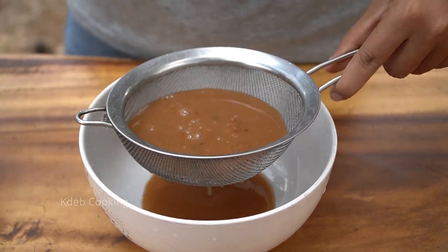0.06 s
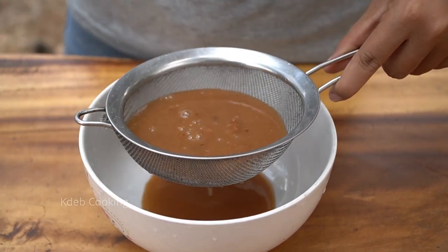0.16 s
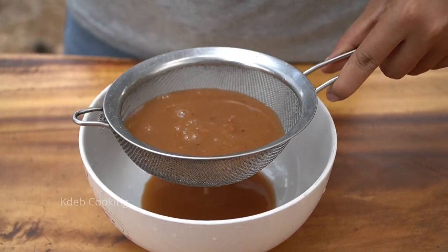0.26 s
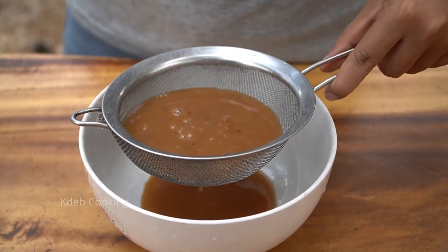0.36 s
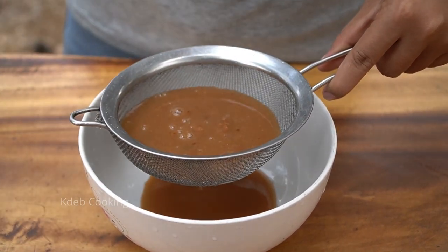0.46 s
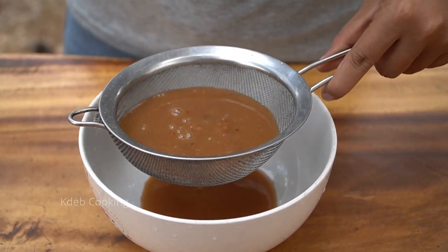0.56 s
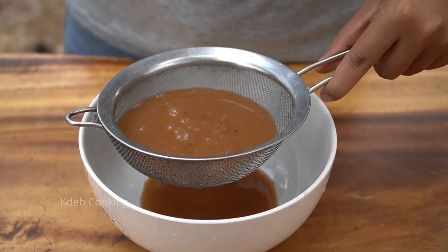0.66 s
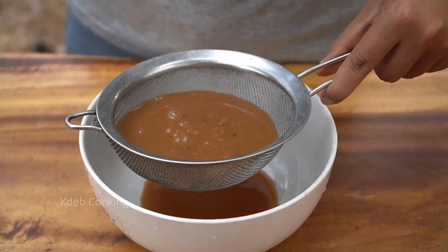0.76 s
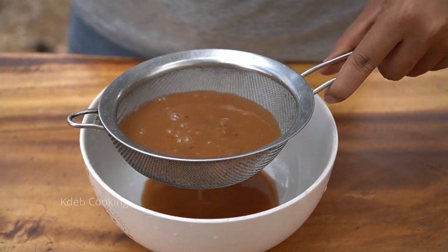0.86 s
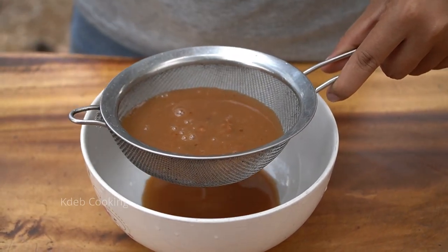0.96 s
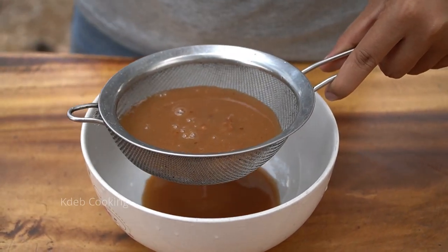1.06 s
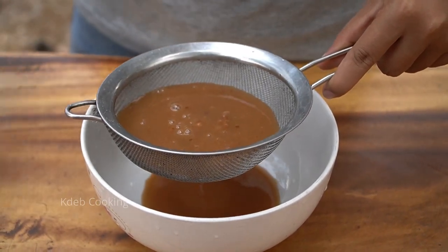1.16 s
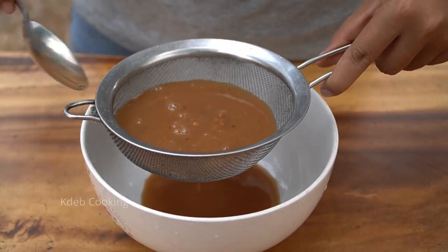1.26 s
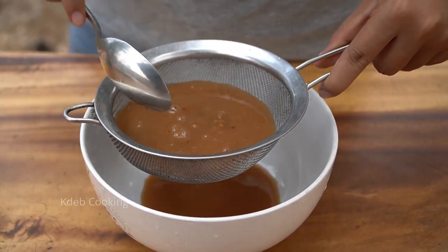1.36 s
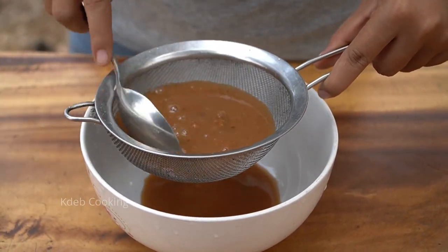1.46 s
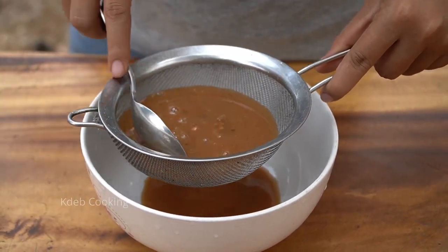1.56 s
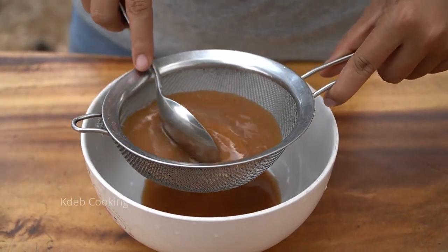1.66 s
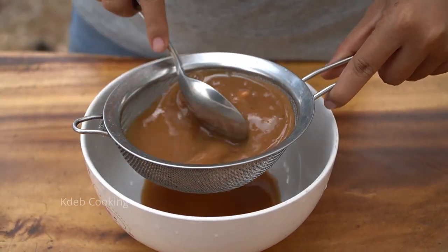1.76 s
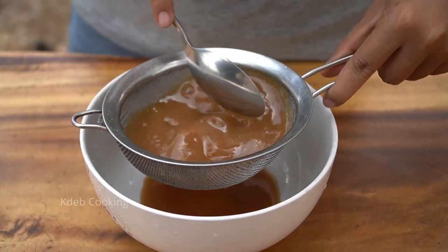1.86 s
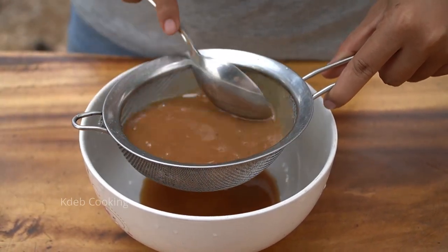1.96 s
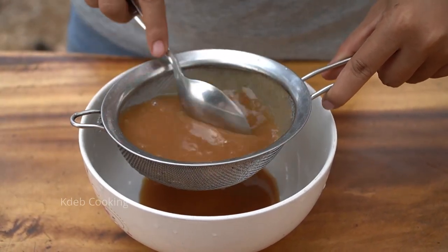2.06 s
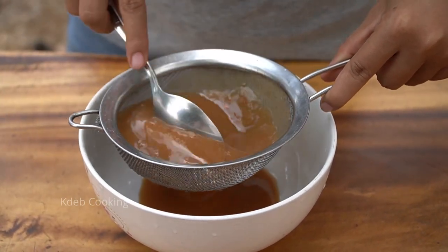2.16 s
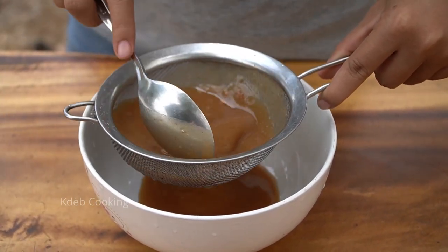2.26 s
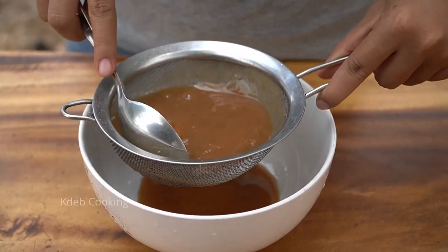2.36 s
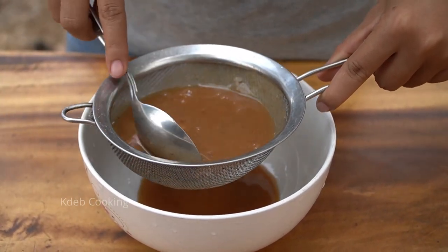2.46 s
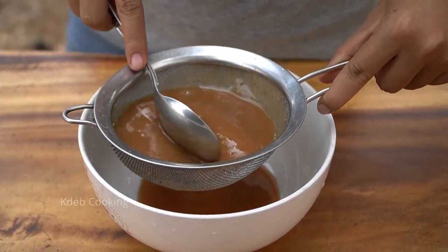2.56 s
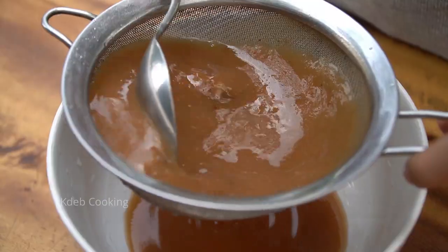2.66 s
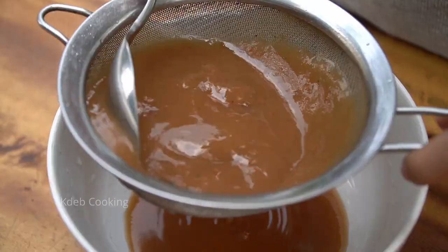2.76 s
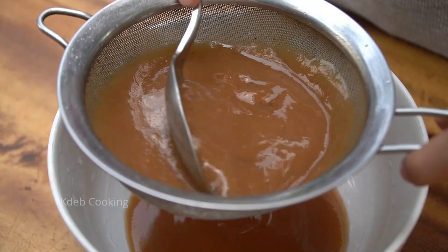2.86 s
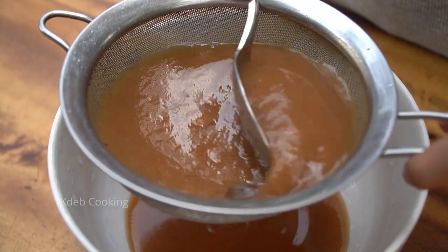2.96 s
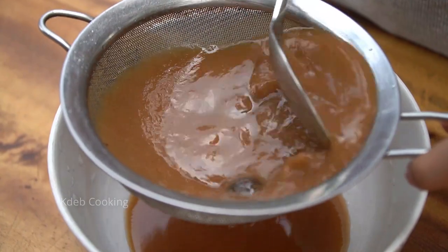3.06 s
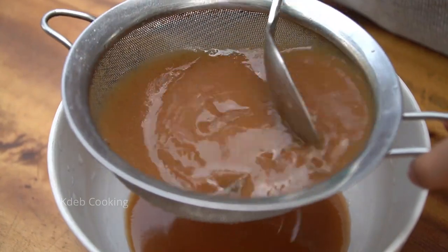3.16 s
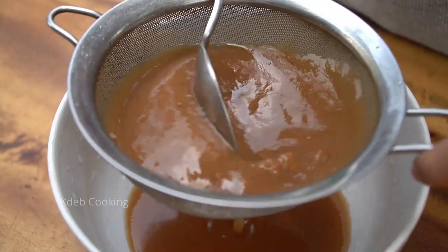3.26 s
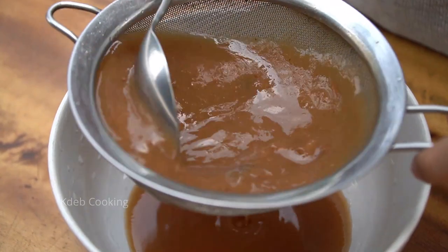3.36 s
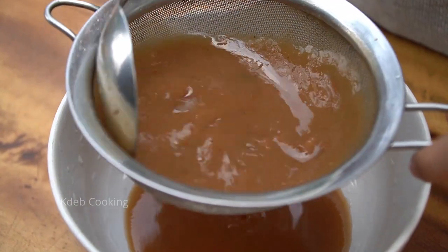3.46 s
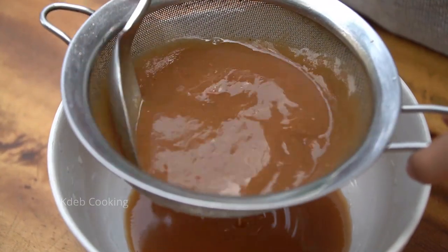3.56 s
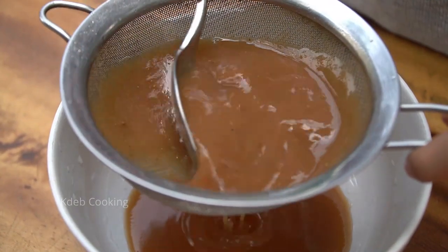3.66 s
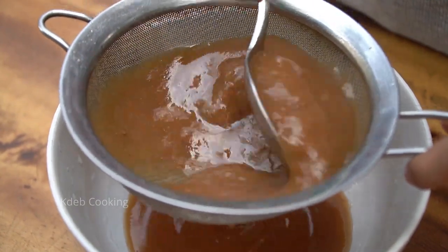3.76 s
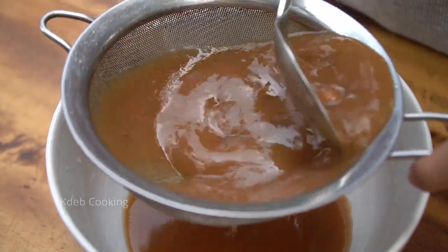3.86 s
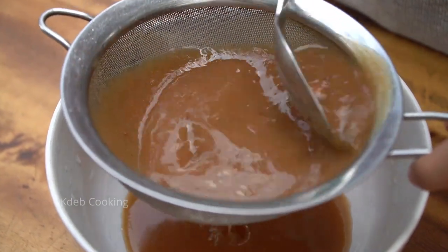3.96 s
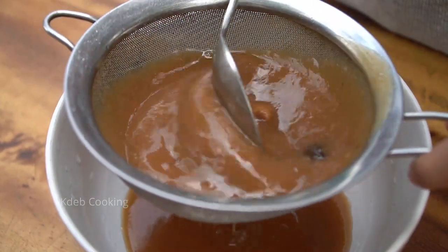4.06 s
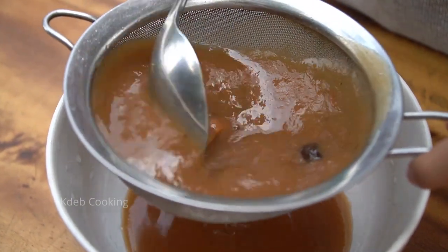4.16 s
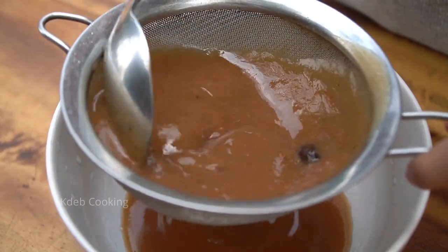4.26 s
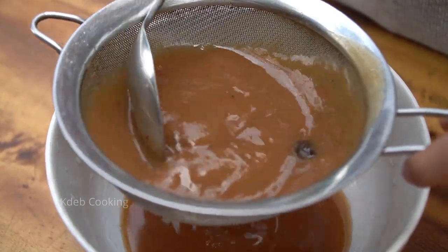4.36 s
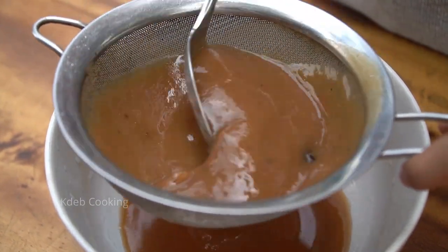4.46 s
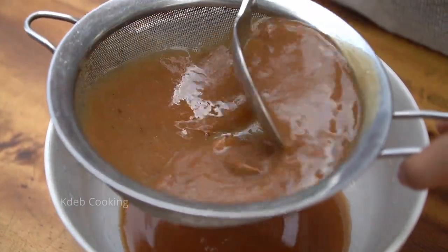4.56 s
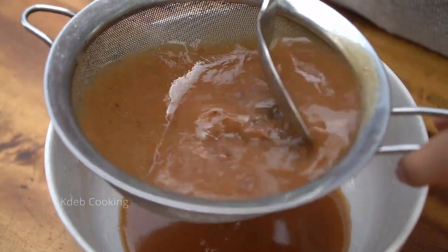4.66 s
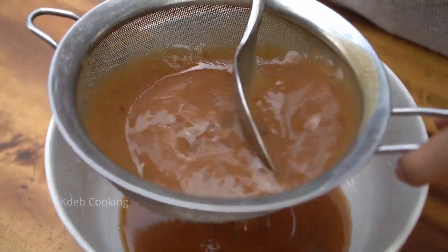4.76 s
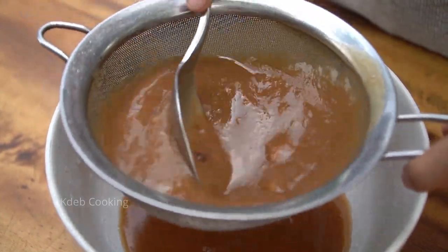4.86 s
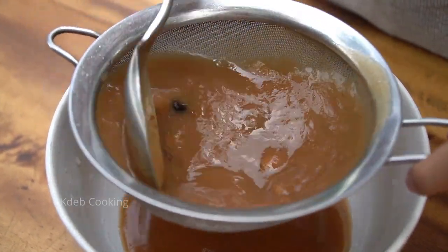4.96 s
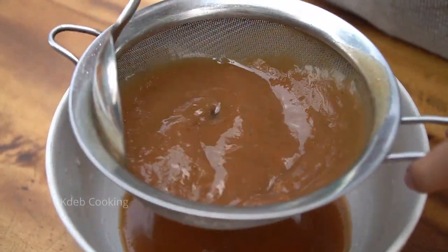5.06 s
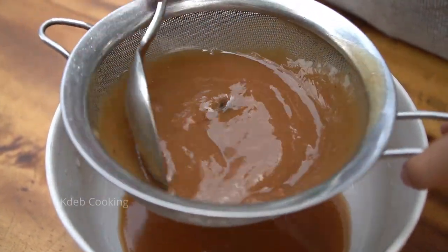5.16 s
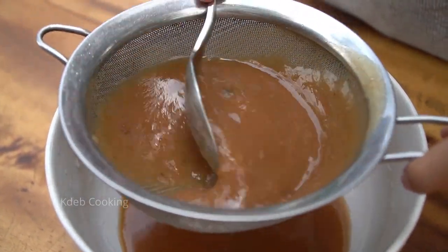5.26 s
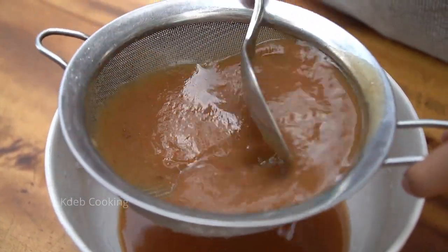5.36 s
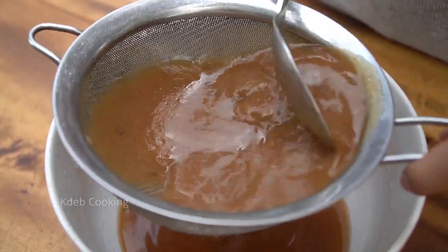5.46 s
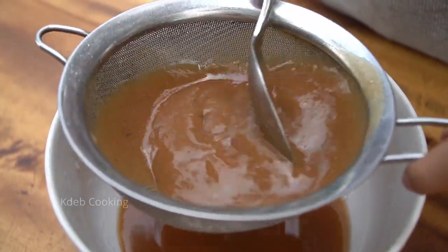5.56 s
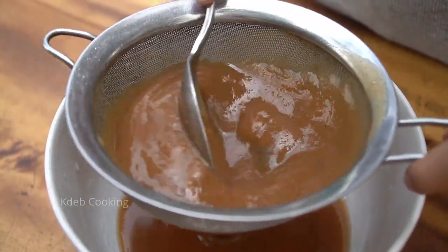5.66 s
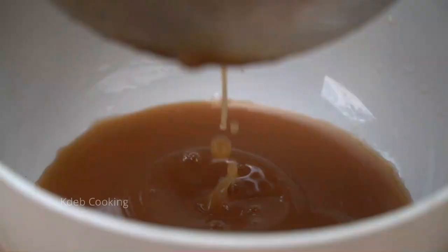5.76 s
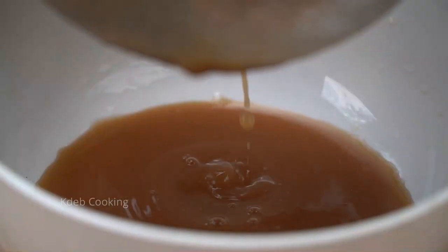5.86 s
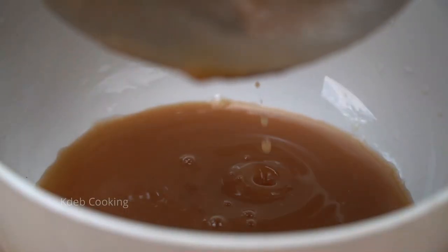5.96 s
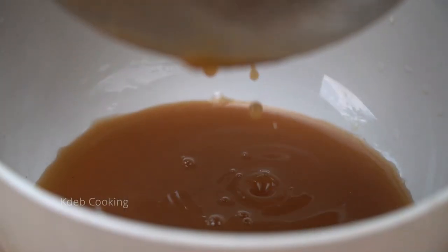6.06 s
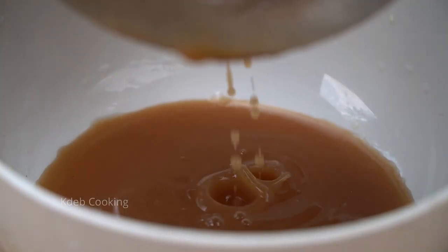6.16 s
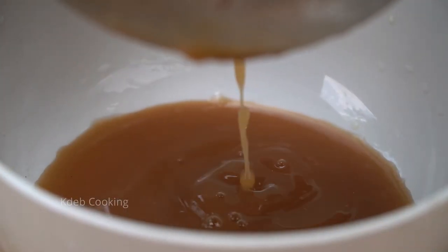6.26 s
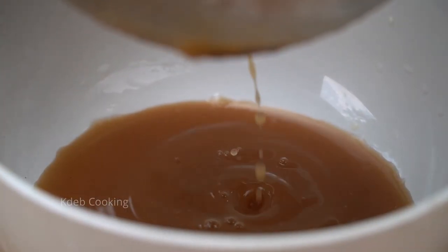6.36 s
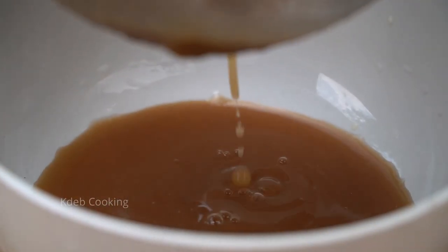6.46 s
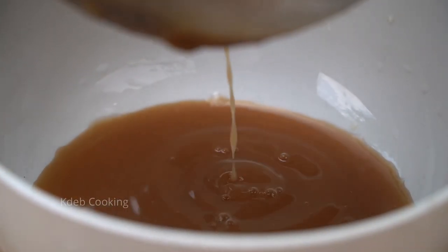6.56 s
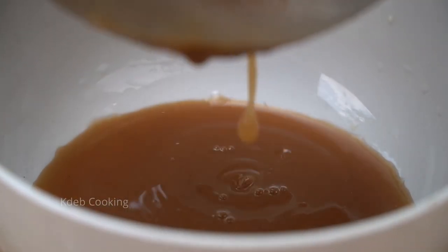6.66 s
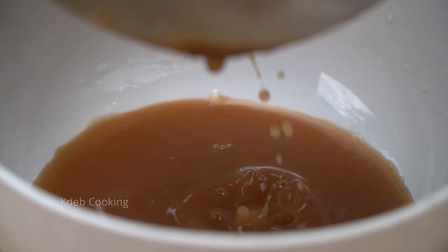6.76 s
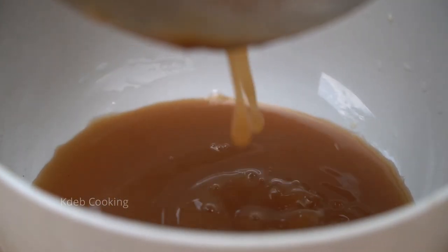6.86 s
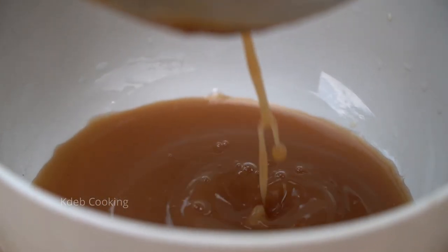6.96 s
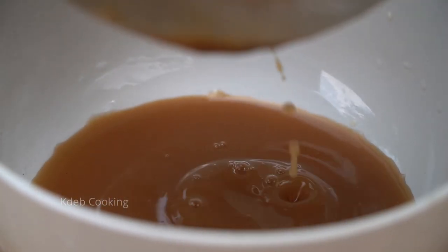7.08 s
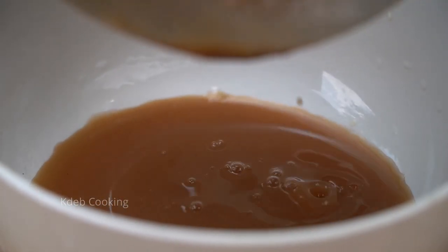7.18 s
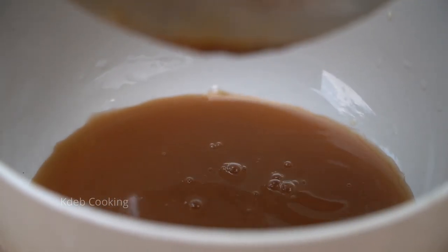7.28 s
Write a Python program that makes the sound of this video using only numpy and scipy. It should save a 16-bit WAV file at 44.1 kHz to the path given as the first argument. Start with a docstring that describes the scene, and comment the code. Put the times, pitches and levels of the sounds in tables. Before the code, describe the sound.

Two hard pot knocks, a pause, then short wet spoon rasps and bright metallic ticks on a wire sieve over quiet rustling hiss.

```python
"""Pressing pulp through a sieve

A spoon stirs and presses wet pulp against a steel mesh sieve over a bowl, outdoors in a steady rustling hiss.
First an emptied pot is set down to the left and bounces: each landing rings damped modes of pot and table top.
The spoon then rasps (mesh wires pluck it), sings in sliding noise bands and ticks on the rim (crack plus ring).
Drops plop into the bowl as rising sines; a few soft low bumps reach the microphone near the end."""
import sys
import numpy as np
from scipy import signal
from scipy.io import wavfile
from scipy.ndimage import uniform_filter1d

SR = 44100
rng = np.random.default_rng(int(sys.argv[2]) if len(sys.argv) > 2 else 0)


def unload_wav(signal):
    """Save mono or channel-first audio to the path in sys.argv[1] as 16-bit WAV at rate SR, clipped to [-1, 1]."""
    wavfile.write(
        sys.argv[1],
        SR,
        np.round(np.clip(np.atleast_2d(signal).T, -1, 1) * 32767).astype(np.int16),
    )


N = 322840

# spoon and mesh modes: pitch_hz, level_db (relative), t60_s (at damping 1)
STEEL = [(686, 11.5, 0.024), (880, 3, 0.021), (1100, -3, 0.079), (1215, 15.5, 0.024), (1750, -15, .03),
         (2920, 0.5, 0.056), (3520, 7.5, 0.049), (4520, 6.5, 0.034), (5050, 11, 0.015), (5735, 7, 0.023),
         (6440, 9.5, 0.011), (7160, -1.5, 0.064), (7800, -2.5, 0.024), (8930, -15, 0.022),
         (9300, -2, 0.046), (10200, -5, 0.0087), (11700, -29, 0.005), (13600, 7, 0.0055),
         (14800, -5, 0.0057)]
RUB_DAMPING = 1.7  # pressing on the mesh shortens the ring
SPOON_HZ = 2860  # the mode of the spoon that the pulp damps least
PLUCKS_PER_S = 14000


def rasp():
    """Wires of the mesh pluck the spoon in a dense, uneven train; each pluck rings the steel."""
    edge_gain, belly_gain, ring_gain, edge_hz, pocket_hz = strokes()
    strength = amp(0.69 * np.minimum(rng.exponential(1, (2, N)), 4))
    plucks = rng.standard_normal((2, N)) * strength * (rng.random((2, N)) < PLUCKS_PER_S / SR)
    plucks[1] = 0.84 * plucks[0] + 0.8 * plucks[1]  # the right side mostly shares the left side's plucks
    slip = amp(1.4 * evened(uniform_filter1d(rng.standard_normal(N), size=500)))  # grip comes and goes

    edge = np.zeros((2, N))
    for (hz, _, _), mode in zip(STEEL, ring(STEEL, 0, RUB_DAMPING, size=2500)):
        rung = signal.oaconvolve(plucks, mode[None], axes=1)[:, :N]
        edge += rung * amp(near(hz, np.maximum(edge_hz, 6800), 0.97) + wetted())
    snaps = bandpass(plucks, 4500, 12500, order=2)  # the bare wire snaps
    grit = evened(snaps) + 0.15 * evened(resonate(resonate(evened(snaps) * 0 + snaps, edge_hz, 3000), edge_hz, 3500))
    edge = evened(evened(edge) + evened(grit))

    # the hollow between spoon and pulp changes pitch as it fills
    pocket = resonate(resonate(plucks, pocket_hz, 260), pocket_hz, 500)
    belly = evened(pocket + 0.5 * resonate(plucks, 1.4 * pocket_hz, 280))
    spoon = resonate(resonate(plucks, SPOON_HZ, 110), SPOON_HZ, 300)
    spoon = evened(spoon * amp(wetted()))
    touching = np.arange(N) / SR > RESTING[0][0]
    return touching * slip * (edge_gain * edge + belly_gain * belly + ring_gain * spoon)


# spoon strokes over the mesh: start_s, length_s, edge_rasp_db, edge_change_db (over the stroke),
# belly_rub_db (at the end of the stroke), spoon_ring_db, rasp_centre_hz, pocket_hz (hollow under the spoon)
STROKES = [(1.548, .01, -52, -15, -63, -64, 8100, 1070), (1.63, 0.13, -54, 3, -78, -64, 8900, 900),
           (2.108, 0.063, -56.5, -2, -67, -70, 6000, 1000), (2.49, 0.15, -50, -12, -54.5, -74, 7150, 1030),
           (2.753, .02, -49, -6, -58, -62, 5900, 1150), (2.868, 0.14, -45, -7.5, -53.5, -65, 10300, 1210),
           (3.244, 0.12, -46.5, -4, -48.5, -71, 7400, 1020), (3.55, .025, -50, 1, -53, -74, 10900, 835),
           (3.634, 0.097, -46, -1.5, -43.5, -62, 11100, 990),
           (3.749, 0.072, -49.5, 2, -44, -68, 11000, 1030), (4.315, .008, -51, -10, -52, -74, 8900, 1030),
           (4.37, 0.03, -49, -6, -61, -69, 9900, 900), (4.424, 0.042, -45.5, -2, -50, -56, 8300, 1100),
           (4.502, 0.044, -36, -7.5, -56, -56, 8800, 1080), (4.806, .14, -46, -1, -44, -52, 8400, 1110),
           (5.135, 0.087, -52, -3, -51, -64, 10000, 1010), (5.23, 0.037, -44, -6, -48.5, -54, 5900, 1170),
           (5.292, 0.065, -45, -0.5, -46, -66, 10200, 1120),
           (5.603, 0.086, -46.5, -2.5, -52, -74, 8300, 1060), (5.815, 0.14, -51, 2, -69, -76, 7740, 950),
           (5.954, 0.062, -46.5, -1.5, -54, -56, 7400, 940), (6.252, 0.02, -47, -7, -50.5, -65, 5800, 900),
           (6.71, 0.086, -46.5, -4, -51, -58, 10000, 915), (6.82, 0.053, -44.5, -0.5, -53, -64, 7600, 650),
           (7.21, 0.036, -50.5, 2, -52, -63, 7140, 1230)]
# light contact between the strokes: time_s, edge_rasp_db, belly_rub_db
RESTING = [(1.45, -78, -73), (2.6, -71, -70), (2.8, -58, -58), (3.5, -60, -65), (3.97, -60.5, -61),
           (4.6, -62, -59), (5.4, -75, -67), (5.8, -64, -75), (6.1, -52, -66), (6.4, -49.5, -57),
           (6.65, -51.5, -79), (7.32, -54.5, -77)]
RESTING_HZ, RESTING_POCKET_HZ = 7300, 1020
RISE_DB_PER_S, FALL_DB_PER_S = 380, 404  # the spoon bites into the mesh and lets go
ARCH_DB_PER_S = 22  # longer strokes swell more toward their middle
HEAP_DB = 9  # the belly rub swells over a stroke as pulp heaps up
POCKET_WANDER = 0.06  # rms share by which the pocket pitch drifts


def strokes():
    """Each stroke rises, arches while drifting in level, and falls; the louder ones weigh more in the colour."""
    t = np.arange(0, N + 64, 64) / SR
    rest_s, rest_edge_db, rest_belly_db = np.transpose(RESTING)
    start, length, edge, change, belly, ring_db, edge_hz, pocket_hz = np.transpose(STROKES)[:, :, None]
    done = np.clip((t - start) / np.maximum(length, 1e-3), 0, 1)
    rise = -RISE_DB_PER_S * np.maximum(start - t, 0)
    fall = -FALL_DB_PER_S * np.maximum(t - start - length, 0)
    shape = rise + fall - ARCH_DB_PER_S * length * (2 * done - 1) ** 2

    # powers of every stroke, with the resting contact as the last row
    edges = np.vstack([amp(edge + change * done + shape), amp(np.interp(t, rest_s, rest_edge_db))]) ** 2
    belly_db = belly + HEAP_DB * (done - 1) + shape
    bellies = np.vstack([amp(belly_db), amp(np.interp(t, rest_s, rest_belly_db))]) ** 2
    drift = 1 + POCKET_WANDER * evened(uniform_filter1d(rng.standard_normal(len(t)), size=20))
    controls = (np.sqrt(edges.sum(0)), np.sqrt(bellies.sum(0)), amp(ring_db + shape).sum(0),
                np.append(edge_hz, RESTING_HZ) @ edges / edges.sum(0),
                np.append(pocket_hz, RESTING_POCKET_HZ) @ bellies / bellies.sum(0) * drift)
    return [np.interp(np.arange(N) / SR, t, c) for c in controls]


SMOTHER_DB = 4.0  # spread of the random level points under the pulp


def wetted():
    """Pulp smothers and frees a mode from moment to moment: slow chance in dB."""
    steps = rng.standard_normal(N // 1300 + 2)
    return SMOTHER_DB * np.interp(np.arange(N) / 1300, np.arange(len(steps)), steps)


# stretches where the mesh sings in one band: start_s, length_s, level_db, first_pitch_hz, last_pitch_hz,
# width_hz (of the first of two resonances; the second is twice as wide)
SINGING = [(1.62, .17, -63, 8900, 10400, 900), (2.855, .06, -52.5, 10700, 10000, 900),
           (2.91, .09, -60, 9900, 9200, 700), (3.225, 0.078, -57, 10500, 10200, 900),
           (3.27, 0.035, -55, 9200, 9000, 500), (3.33, 0.036, -55, 10800, 9300, 900),
           (3.625, 0.097, -51, 7200, 7000, 450), (3.695, 0.028, -42.5, 12500, 9900, 1500),
           (3.735, .1, -56, 10000, 10900, 900), (3.755, 0.046, -54, 4750, 4600, 250),
           (4.495, .035, -38, 9100, 8600, 900), (4.51, .016, -39, 7240, 5000, 600),
           (4.492, .06, -54, 4400, 4500, 300), (4.78, .062, -55, 5100, 5050, 180),
           (4.82, .075, -56, 4500, 4350, 200), (5.175, .06, -59, 11400, 9350, 800),
           (5.615, 0.088, -59, 10700, 8850, 900), (6.785, .035, -50, 7800, 6900, 800)]


def singing():
    """The spoon's edge crosses the wires fast enough to blur into a fuzzy band that slides with its speed."""
    out = np.zeros((2, N))
    for row, noise in zip(SINGING, rng.standard_normal((len(SINGING), 12000))):
        s, length, db, first_hz, last_hz, width = row
        done = np.linspace(0, 1, min(round(length * SR), 12000))
        hz = first_hz + (last_hz - first_hz) * done
        grip = amp(2.0 * evened(uniform_filter1d(noise[::-1], size=250)))[:len(done)]
        band = evened(resonate(resonate(noise[:len(done)], hz, width), hz, 2 * width))
        add(out, s, amp(db) * np.sin(np.pi * done) ** 0.51 * grip * band, -1.5)
    return out


# spoon taps: start_s, level_db, main_pitch_hz, second_pitch_hz, bare_crack_share (0-1),
# dull_body_db (modes up to 4 kHz), left_minus_right_db
TICKS = [(1.536, -27.5, 7040, 3210, 0.65, -25, 1), (2.7424, -30.5, 5800, 2880, 0.26, -16, 0),
         (2.757, -30, 5940, 2880, 0.4, -22, 2), (2.8716, -26, 2900, 5580, 0.54, -29, 0),
         (3.268, -34, 5640, 9000, 0.2, -20, 2), (3.289, -31, 5570, 2930, 0.15, -21, -1),
         (3.336, -28.5, 4600, 2920, 0.2, -16, -1), (3.552, -33, 8800, 11300, .74, -17, -4),
         (3.6312, -20.5, 11400, 7240, 0.85, -27, 4), (3.6364, -24, 11000, 7100, 1, -25, -3),
         (3.6505, -35, 11500, 7140, 0.7, -24, 0), (3.6664, -28.5, 7200, 9500, 0.55, -25, 0),
         (3.677, -31, 13500, 7300, 0.8, -24, 0), (3.7143, -26, 10800, 9600, 0.5, -15, -2),
         (3.772, -40, 4700, 10500, .2, -18, 0), (3.797, -35, 4370, 5550, 0.5, -13, -1),
         (4.3061, -21, 5300, 8900, 0.56, -8, 0), (4.3062, -26.5, 1240, 3960, .6, -6, 0),
         (4.4258, -22.5, 6830, 9200, 0.66, -13, -2), (4.4355, -25, 6800, 8800, 0.6, -19, 6),
         (4.458, -29, 9600, 11000, 0.6, -14, -3), (4.471, -17.5, 5060, 8800, 0.68, -22, 2),
         (4.4828, -36, 8500, 13500, .73, -24, -4), (4.494, -24, 4450, 6000, 0.9, -29, 4),
         (4.519, -29, 4970, 8900, .77, -24, 5), (4.537, -30, 4480, 6500, 0.6, -24, 2),
         (4.7852, -37, 4630, 5030, 0.26, -10, -4), (4.821, -38, 5030, 4500, .2, -13, -2),
         (4.908, -40, 4500, 4200, 0.1, -20, 0), (4.9222, -34, 7700, 7100, 0.3, -22, 1),
         (4.934, -36, 4810, 3900, 0.3, -20, 0), (5.2345, -27.5, 5710, 7800, 0.37, -20, 1),
         (5.2954, -30, 6800, 8790, .68, -22, 0), (5.306, -28, 6960, 10800, 0.7, -19, 0),
         (5.3127, -27.5, 8050, 10460, 0.6, -21, 2), (5.322, -33, 6500, 12000, .6, -24, 0),
         (5.408, -29, 4580, 7900, 0.61, -10, -1), (5.457, -36, 5800, 4430, 0.6, -19, -1),
         (5.493, -34.5, 4420, 5660, 0, -22, -3), (5.612, -29, 5630, 4600, 0.5, -24, 1),
         (5.556, -40, 7200, 9500, .7, -24, 0), (5.9817, -36, 6000, 7890, 0.4, -17, 3),
         (6.2535, -28.5, 5150, 4240, .26, -11, -1), (6.565, -33, 2990, 4390, 0.3, -28, -1),
         (6.8185, -31, 7200, 9310, .64, -18, 2), (6.8313, -19.5, 5740, 6600, 0.4, -26, 1),
         (6.8318, -38, 12000, 9300, 0.4, -32, 0), (6.8804, -31, 9500, 5700, .88, -21, 0),
         (7.019, -32, 5100, 6560, .72, -24, -1), (7.2064, -23, 5780, 5150, 0.43, -30, 6),
         (7.2068, -35, 3570, 5200, .2, -30, 2), (7.2134, -23, 5880, 5100, 0.43, -24, 1)]
SECOND_DB = -3.5  # level of the second pitch
TICK_DAMPING = 1.39  # hand and pulp shorten the ring
BODY_DAMPING = 1.25  # the low modes die faster still


def ticks():
    """A sharp crack, then the steel modes that the struck spot favours, pulled a little by the pulp."""
    out, steel, t = np.zeros((2, N)), np.array(STEEL), np.arange(2500) / SR
    hz = steel[:, :1]
    damping = TICK_DAMPING * np.where(hz > 2000, 1, BODY_DAMPING)
    for row, noise in zip(TICKS, rng.standard_normal((len(TICKS), 2500))):
        s, db, first_hz, second_hz, bare, body_db, pan_db = row
        pulled, weight_db = steel.copy(), np.where(hz > 4000, -17.0, body_db)
        for centre_hz, level_db in ((second_hz, SECOND_DB), (first_hz, 0)):
            nearest = np.argmin(abs(hz - centre_hz))
            pulled[nearest, 0], weight_db[nearest] = centre_hz, level_db
        signs = np.sign(noise[-len(hz):, None])
        rung = (ring(pulled, weight_db, damping, size=2500) * signs).sum(0)

        low_hz = 0.79 * min(first_hz, second_hz)
        high_hz = min(1.35 * max(first_hz, second_hz), 0.45 * SR)
        crack = bandpass(noise, low_hz, high_hz, order=2) * amp(-60 * t / 0.0051)
        bare = np.clip(bare, 0, 1)
        onset = np.minimum(t / (0.002 * (1.01 - bare)), 1)  # a barer tap speaks sooner
        sound = (1 - bare) * rung / abs(rung).max() * onset + bare * crack / abs(crack).max()
        add(out, s, amp(db) * sound / abs(sound).max(), pan_db)
    return out


# pot and table top modes: pitch_hz, level_db (relative), t60_s (at damping 1), flat_landing_gain_db
POT = [(142, -15, 0.4, -11), (246, -21.5, 0.49, -3), (318, -13.5, 0.19, 1), (383, -3.5, 0.057, 2.5),
       (486, -28, 0.085, -10), (593, -19, .04, -3), (670, -4, 0.12, -6), (720, -8.5, 0.093, 11.5),
       (782, -10, 0.31, -9), (834, -4, 0.068, 8.5), (920, -2, 0.15, 1), (885, 7.5, 0.041, 8),
       (1020, -11.5, 0.3, 4), (1050, -13, 0.091, 2), (1110, 11, 0.031, 0.5), (1335, -14, 0.066, -1),
       (1520, -20, 0.05, -8), (1625, -13.5, 0.059, 15.5), (1980, -25, 0.024, 21.5), (2310, -8, 0.06, -6),
       (3170, 9.5, 0.046, 4.5), (3776, 6.5, 0.05, -16), (4180, 0, 0.022, 12), (4450, 11, 0.044, -5),
       (4800, 4, 0.021, -15), (5190, 0.5, 0.042, 3), (5600, 6.5, 0.016, -5), (6050, -7, .03, 2),
       (6600, 0, 0.014, -9), (7320, -11.5, 0.016, 6), (7930, 0.5, 0.037, -16), (9200, -13, 0.02, 0),
       (10400, -9, 0.014, 2), (12000, -12, 0.013, 0)]
# pot set down: start_s, level_db, treble_db, treble_slope_db_per_octave, contact_s, damping (factor),
# flatness (0-1), left_minus_right_db
KNOCKS = [(0.3084, -7, -9, 2, 0.00056, 1.7, 0.02, 4), (0.338, -32.5, -27, -11, 0.0013, 0.49, 0.2, 1),
          (.37, -39, -32, -13, 0.0017, 1.4, 0.1, -1), (.402, -42, -29, -13, 0.0012, 0.67, 0.3, -4),
          (0.4355, -10.5, -4, -5.5, 0.00041, 1.96, 0.87, 5), (0.4649, -28, -20, -13, 0.0016, 4.6, 0.4, 0),
          (0.4766, -23.5, -17, -14, 0.0012, 1.3, 0.86, 3.5), (0.53, -34.5, -23, -12, 0.0017, 1.8, 0.6, 3),
          (1.009, -42.5, -27, -2, 0.0011, 1.3, 0.9, 3)]
TREBLE_FROM_HZ = 2600


def pot():
    """Each landing rings the same modes; a short hard contact wakes the high ones and snaps."""
    out, table, t = np.zeros((2, N)), np.array(POT), np.arange(12000) / SR
    hz, gained_db = table[:, :1], table[:, 3:]
    high = hz[:, 0] > TREBLE_FROM_HZ
    flip = (-1.) ** np.arange(len(POT))[:, None]  # neighbouring modes radiate in opposite senses
    for row, noise in zip(KNOCKS, rng.standard_normal((len(KNOCKS), 12000))):
        s, db, treble_db, slope_db, contact, damping, flat, pan_db = row
        weight_db = flat * gained_db + high[:, None] * (treble_db + slope_db * np.log2(hz / 3000))
        modes = flip * ring(table[:, :3], weight_db, damping, size=12000)
        blow = signal.windows.hann(max(round(contact * SR), 3) + 2)
        dull = np.convolve(modes[~high].sum(0), blow / blow.sum())[:12000]
        snap = np.diff(noise, prepend=0) * amp(treble_db + 2 * slope_db - 18.0 - 60 * t / 0.011)
        bright = (modes[high].sum(0) + snap) * np.minimum(t / contact, 1)  # builds over the contact
        # the slope of the dull part favours its upper modes, with unity gain at 1 kHz
        sound = np.diff(dull, prepend=0) * SR / (2 * np.pi * 1000) + bright
        add(out, s, amp(db) * sound / abs(sound).max(), pan_db)
    return out


# drops falling into the bowl: start_s, level_db, pitch_hz (at the start)
DROPS = [(3.534, -35, 1150), (5.117, -40, 1000), (5.355, -35.5, 1110), (6.425, -41, 1690),
         (6.817, -30.5, 1800), (7.08, -40.5, 1320)]


def drops():
    """A small bubble: a short sine that rises a little."""
    out, t = np.zeros((2, N)), np.arange(1500) / SR
    for s, db, hz in DROPS:
        tone = np.sin(2 * np.pi * hz * t * (1 + 0.97 * t))
        add(out, s, tone * amp(db - 60 * t / 0.024) * np.minimum(t / 0.00071, 1), 0)
    return out


# soft low bumps: start_s, level_db (relative), pitch_hz
BUMPS = [(6.52, -73, 90), (6.556, -66, 150), (6.595, -67, 100), (6.729, -72, 200), (6.845, -70, 160),
         (6.884, -61, 190), (6.935, -65, 100), (7.051, -53, 256), (7.049, -54, 417), (7.065, -70, 70),
         (7.089, -69, 100)]


def bumps():
    """A short sine and a puff of low noise around the same pitch swell and fade together."""
    out, t = np.zeros((2, N)), np.arange(4000) / SR
    swell = (t / 0.0033) * np.exp(1 - t / 0.0058)
    for (s, db, hz), noise in zip(BUMPS, rng.standard_normal((len(BUMPS), 4000))):
        puff = bandpass(noise, 0.74 * hz, 1.5 * hz, order=1)
        soft = 0.32 * np.sin(2 * np.pi * hz * t) + 0.55 * evened(puff)
        add(out, s, amp(db) * soft * swell, 0)
    return out


# surrounding hiss, louder once the microphone is closer: time_s, level_db (relative)
HISS = [(0.0, -55), (0.6, -54.5), (2.26, -55.5), (2.55, -54.5), (2.79, -50.5), (4.4, -51), (5.0, -52),
        (6.08, -50), (7.32, -51.5)]
# hiss spectrum: frequency_hz, density_db (relative, per Hz)
HISS_COLOUR = [(15, -74), (25, -56), (108, -30.5), (226, -24), (296, -14.5), (496, -7.5), (651, -5),
               (831, -5), (927, -3.5), (1250, -2.5), (2400, -1), (2980, -2), (6000, -8), (10700, -14.5),
               (13500, -20), (15600, -23.5), (16500, -49)]
# stereo likeness of the hiss: frequency_hz, left_right_likeness (correlation, -1 to 1)
LIKENESS = [(60, 0.56), (130, 0.9), (290, 0.94), (640, 0.91), (1410, 0.68), (3100, 0.48), (6820, 0.12),
            (15000, 0.1)]
# stereo balance of the hiss: frequency_hz, left_minus_right_db
SIDES = [(60, -0.5), (110, 1), (200, -1), (380, 0), (700, -1.5), (1290, -2), (2380, -2.5), (4400, -0.5),
         (8120, 0.5), (15000, -3.5)]
HISS_TILT_DB = 0.65  # extra treble per octave at the opening level
TILT_PER_DB = -0.06  # change of that tilt for each dB above the opening level
LEFT_LAG_S = 3.0e-5  # the hiss reaches the left port a little later


def hiss():
    """Random short-time spectra with faint drifting patches."""
    frames, hz = N // 256 + 5, np.fft.rfftfreq(1024, 1 / SR)
    a, b, c, d, patches = rng.standard_normal((frames, 513, 5)).T
    patches = uniform_filter1d(uniform_filter1d(patches, size=12, axis=0), size=14, axis=1)
    patches_db = evened(patches)
    s, db = np.transpose(HISS)
    level_db = np.interp(np.arange(frames) * 256 / SR, s, db)
    octaves = np.clip(np.log2(hz / 2500 + 1e-9), -1, 3)[:, None]
    tilt_db = octaves * (HISS_TILT_DB + TILT_PER_DB * (level_db - db[0]))

    same = np.clip(read(LIKENESS, hz), -1, 1)[:, None]
    shared, separate = a + 1j * b, c + 1j * d
    lag = np.exp(-2j * np.pi * LEFT_LAG_S * hz)[:, None]
    z = np.array([shared * lag, same * shared + np.sqrt(1 - same ** 2) * separate])
    z *= amp(read(HISS_COLOUR, hz)[:, None] + patches_db)
    z /= np.sqrt(np.mean(abs(z) ** 2))
    sides_db = np.array([0.5, -0.5])[:, None, None] * read(SIDES, hz)[:, None]
    z *= amp(level_db + tilt_db + sides_db)
    return amp(-16.0) * signal.istft(z, nperseg=1024, noverlap=768)[1][:, :N]


def nearby(x):
    """Short scatter off bowl, table and body: sparse taps dying fast."""
    t = np.arange(4000) / SR
    sparse = rng.choice([-1., 1.], (2, 4000)) * (rng.random((2, 4000)) < 0.05)
    taps = sparse * amp(-60 * t / 0.028) * (t > 0.002)
    return signal.oaconvolve(x, taps / np.linalg.norm(taps[0]), axes=1)[:, :N]


def radiated(x, hz):
    """Small objects push little air at low pitch: a high-pass."""
    return signal.sosfilt(signal.butter(3, hz, "high", fs=SR, output="sos"), x)


def ring(modes, weight_db, damping, size):
    """One row per mode: a dying sine."""
    hz, db, t60 = np.transpose(modes)[:, :, None]
    t = np.arange(size) / SR
    return amp(db + weight_db - 60 * damping * t / t60) * np.sin(2 * np.pi * hz * t)


def resonate(x, hz, width):
    """Shifts the curve hz down to zero, smooths, and shifts back: a resonance that can move."""
    turn = np.exp(2j * np.pi * np.cumsum(hz * np.ones(x.shape[-1])) / SR)
    r = np.exp(-np.pi * width / SR)
    return 2 * (turn * signal.lfilter([1 - r], [1, -r], x / turn)).real


def bandpass(x, low_hz, high_hz, order):
    """Keeps the band between two frequencies."""
    return signal.sosfilt(signal.butter(order, [low_hz, high_hz], "band", fs=SR, output="sos"), x)


def near(hz, centre_hz, octaves):
    """Weight in dB that falls away from the centre pitch."""
    return -6.0 * (np.log2(hz / centre_hz) / octaves) ** 2


def amp(db):
    """Decibels to gain."""
    return 10 ** (np.asarray(db) / 20)


def evened(x):
    """Scales to rms 1."""
    return x / np.sqrt(np.mean(x ** 2) + 1e-20)


def read(points, hz):
    """Reads a spectrum on a log axis."""
    f, value = np.transpose(points)
    return np.interp(np.log(hz + 1), np.log(f + 1), value)


def add(mix, s, sound, pan_db):
    """Places a sound in time and between left and right (pan_db is left minus right)."""
    part = mix[:, round(s * SR):][:, :len(sound)]
    part += amp([[pan_db / 2], [-pan_db / 2]]) * sound[:part.shape[1]]


def scene():
    """Pot, ticks, drops and singing with their scatter, then the rasp, hiss and bumps without it."""
    close = radiated(pot(), 246) + radiated(ticks() + drops() + singing(), 440)
    scatter = amp(-5.5) * nearby(radiated(close, 1320))
    return close + scatter + radiated(rasp(), 570) + hiss() + radiated(bumps(), 55)


EDGE_HZ = 15900


def record(dry):
    """The band limit: a steep low-pass."""
    lowpass = signal.firwin(511, EDGE_HZ, window=("kaiser", 9), fs=SR)
    return signal.oaconvolve(dry, lowpass[None], "same")


dry = scene()
out = record(dry)
unload_wav(out)
```